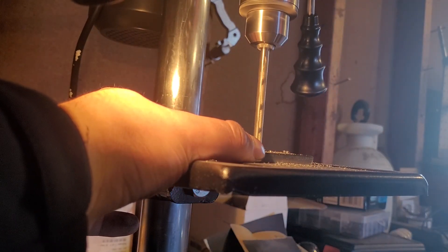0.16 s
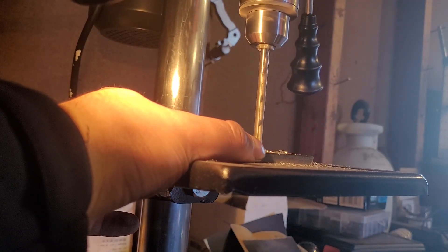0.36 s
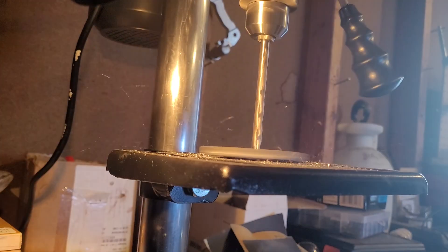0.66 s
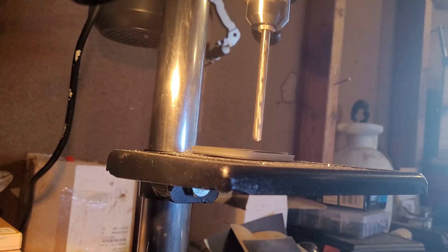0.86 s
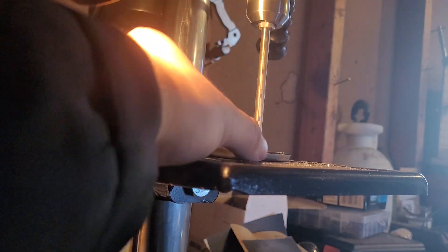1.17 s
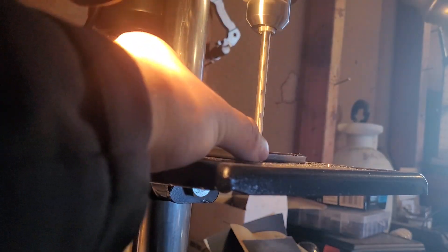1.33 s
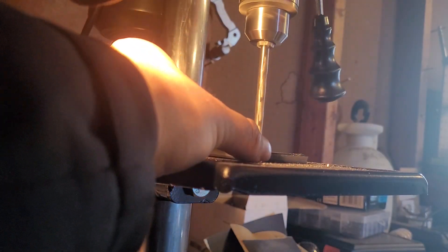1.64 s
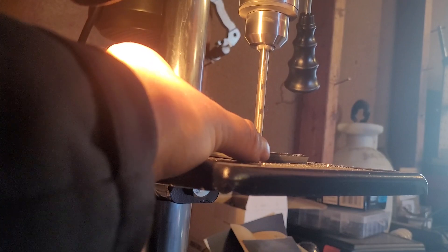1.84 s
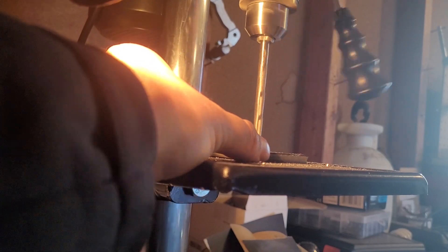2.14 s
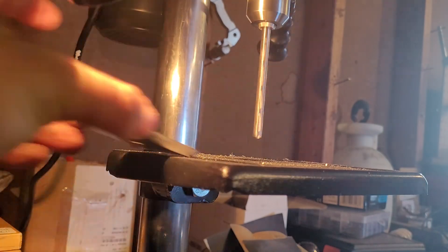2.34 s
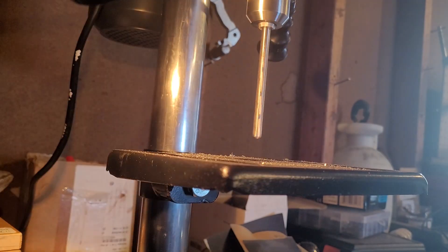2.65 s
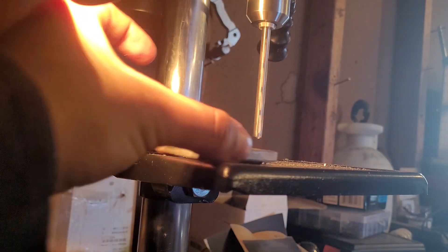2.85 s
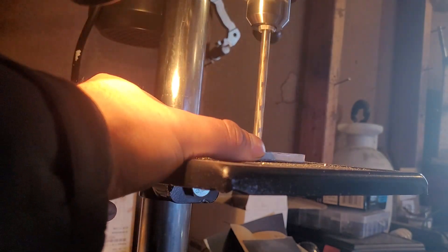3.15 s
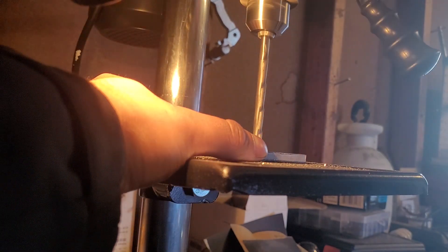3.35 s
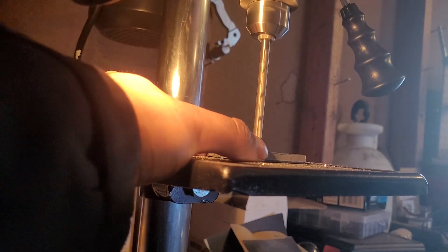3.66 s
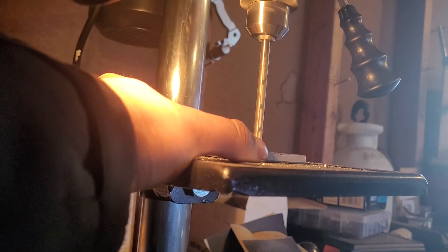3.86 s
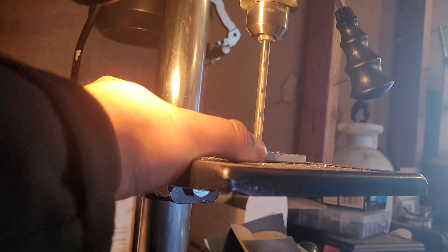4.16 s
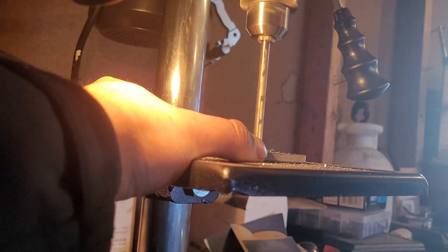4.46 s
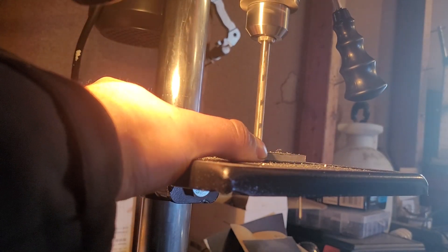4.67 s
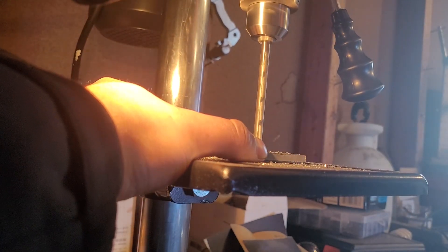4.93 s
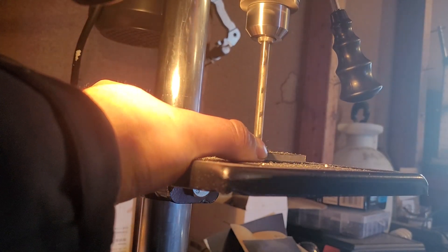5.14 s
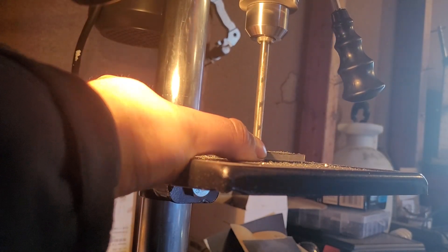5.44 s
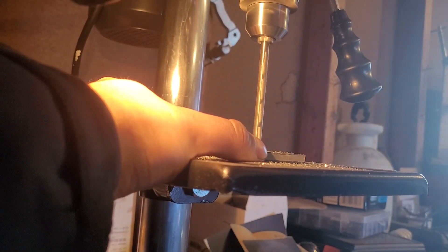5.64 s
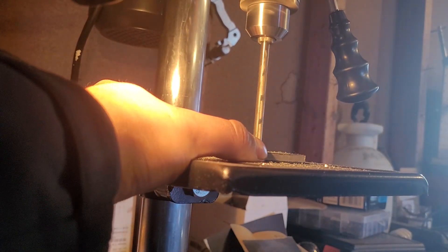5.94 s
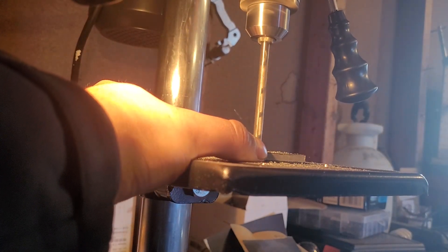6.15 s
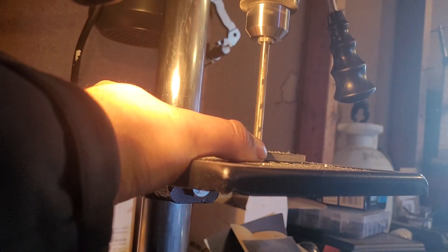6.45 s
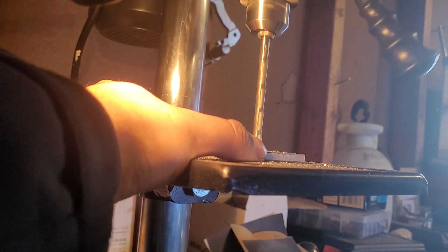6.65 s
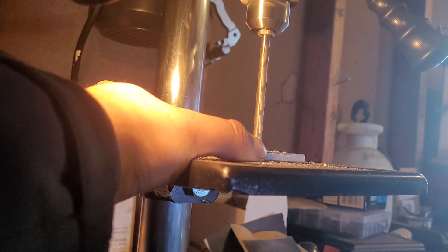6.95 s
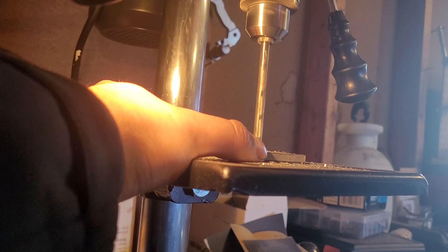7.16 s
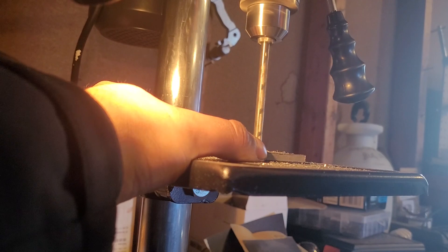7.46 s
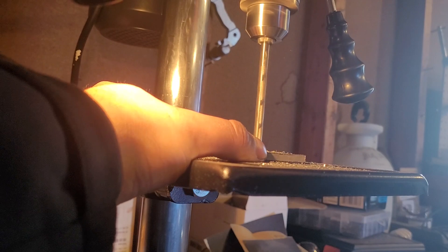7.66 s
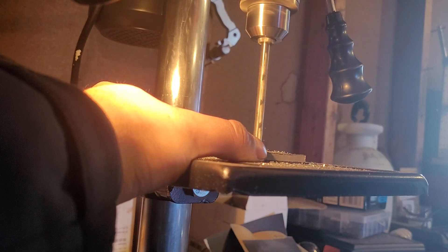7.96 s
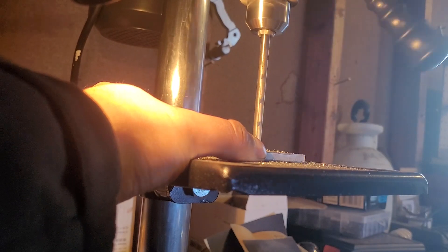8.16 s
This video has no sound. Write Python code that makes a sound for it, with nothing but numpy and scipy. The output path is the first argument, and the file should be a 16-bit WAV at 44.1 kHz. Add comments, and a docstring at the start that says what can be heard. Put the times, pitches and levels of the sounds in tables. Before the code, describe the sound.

A belt-driven drill press whirrs, hums and rattles continuously, heard close in stereo with short, dry garage echoes. A rough grinding cut ends in a clattering scrape and tiny high squeals as the steel plate spins loose. After a short sizzling bite come knocks, squeaks and a metallic ring. Then the drill cuts repeatedly, gritty and hissing, the rattle tightening each time and loosening as it lifts.

```python
"""You first hear a drill already biting into a small steel plate: it grinds, chatters and sizzles.
Around it a belt-driven drill press hums, whirrs and rattles in a garage; each new bite slows it down.
Steady tones make the hum, tiny random impacts through resonances the rattle, grinding and sizzle.
Let go, the plate scrapes round on the iron table, squeaks and squeals on the bit, knocks and rings once.
The drill comes down several more times; the sounds of plate and table are thumps and clicks that ring."""
import sys
import numpy as np
from scipy import signal
from scipy.fft import rfft, irfft
from scipy.io import wavfile

SR = 44100
rng = np.random.default_rng(int(sys.argv[2]) if len(sys.argv) > 2 else 0)


def master(y):
    """Save y as 16-bit WAV."""
    cut = np.clip(np.atleast_2d(y).T, -1, 1)
    pcm = np.round(cut * 32767)  # scale
    wavfile.write(sys.argv[1], SR, pcm.astype(np.int16))


N = 366030
TIME = np.arange(N) / SR   # s
BINS_HZ = np.maximum(np.arange(N // 2 + 1) * SR / N, 1)


def from_db(db):
    """Turn decibels into a gain."""
    return 10 ** (np.asarray(db) / 20)


def rms_one(x):
    """Scale x to an average strength (rms) of 1."""
    return x / np.sqrt(np.mean(x ** 2) + 1e-20)


def per_bin(points):
    """Read a table at every frequency of the spectrum, with straight lines over log frequency."""
    hz, value = np.transpose(points)
    return np.interp(np.log(BINS_HZ), np.log(np.maximum(hz, 1)), value)


def coloured(x, spectrum):
    """Give x a broad balance of low and high sound; rms 1."""
    return rms_one(irfft(rfft(x) * from_db(per_bin(spectrum)), N))


def high_pass(x, edge_hz):
    """Weaken everything below edge_hz, so that the gaps under a ringing part stay dark."""
    return signal.sosfilt(signal.butter(2, edge_hz, "high", fs=SR, output="sos"), x)


def drift(rate_hz):
    """Wander smoothly and at random with a spread of 1; a higher rate wanders faster."""
    step = 40   # samples between the slow points
    r = np.exp(-2 * np.pi * rate_hz * step / SR)
    warm_up = 2000   # points dropped while the filter settles
    noise = rng.standard_normal(N // step + 2 + warm_up)
    slow = rms_one(signal.lfilter([1], [1, -2 * r, r * r], noise)[warm_up:])
    return np.interp(np.arange(N) / step, np.arange(len(slow)), slow)


def resonate(x, modes, shift_db=lambda hz: 0):
    """Let x shake a set of resonances, each driven harder or softer by shift_db; rms 1."""
    out = 0
    for k, (hz, width, db) in enumerate(modes):
        r = np.exp(-np.pi * width / SR)
        poles = [1, -2 * r * np.cos(2 * np.pi * hz / SR), r * r]
        driven = x * from_db(db + shift_db(hz))
        sign = (-1) ** k   # neighbours get opposite signs
        out = out + sign * (1 - r * r) * signal.lfilter([1, 0, -1], poles, driven)
    return rms_one(out)


def ring(clicks, hz, t60):
    """Let each click start a sine that dies away by 60 dB in t60 seconds."""
    r = from_db(-60 / (t60 * SR))
    w = 2 * np.pi * hz / SR
    return signal.lfilter([0, np.sin(w)], [1, -2 * r * np.cos(w), r * r], clicks + 1e-18)


def grains(per_s, spread_db):
    """Make tiny impacts of uneven size at random moments; rms 1."""
    sizes = from_db(spread_db * np.minimum(rng.exponential(1, N), 4)) * rng.choice([-1, 1], N)
    return rms_one(sizes * (rng.random(N) < per_s / SR))


def clicks_at(seconds, db):
    """Place single clicks at the given times."""
    out = np.zeros(N)
    out[np.round(seconds * SR).astype(int)] = from_db(db)
    return out


def fading(x, fade_s):
    """Let every jump in x die away smoothly."""
    return signal.lfilter([1], [1, -np.exp(-1 / (fade_s * SR))], x + 1e-18)


def spurts(per_s, fade_s):
    """Gain that jumps at random moments and dies away."""
    starts = rng.exponential(1, N) * (rng.random(N) < per_s / SR)
    return fading(np.minimum(starts, 2), fade_s)


def swells(rows):
    """Gain of strokes that grow steadily to a peak and fall away."""
    return sum(from_db(db) * np.interp(TIME, [start, peak, end], [0, 1, 0])
               for start, peak, end, db in rows)


INERTIA_S = 0.0401   # the speed follows the load this late


def sluggish(x):
    """Follow x slowly, as the heavy turning parts do."""
    r = np.exp(-1 / (INERTIA_S * SR))
    return signal.lfilter([1 - r], [1, -r], x, zi=[r * x[0]])[0]


# The bit is pressed into the steel: start t/s, end t/s, time to bite t/s, wait until a chip forms t/s,
# time for the chips to clear t/s, sag of the main tone f/Hz, sizzle level/dB, chatter level/dB
# (both levels for the main part of the sound, before its extra layers)
PECKS = [(-0.3, 0.477, 0.078, 0.27, 0.011, 15.2, -41, -42),
         (1.741, 1.921, 0.062, 0.0035, 0.06, 6.1, -40, -39),
         (3.83, 5.394, 0.39, 0.066, 0.085, 8.2, -41, -41.5),
         (5.645, 6.517, 0.0406, 0.0044, 0.065, 5.8, -40, -40),
         (7.114, 8.118, 0.048, 0.005, 0.015, 4.8, -41, -40.5)]
CHIP_HOLD_S = 0.0083   # the chip keeps tearing this long after the pressure ends


def feed(sizzle_power=1.05):
    """Pressure drags the speed down and drives the cut: gives sag in Hz, sizzle gain, chatter gain."""
    drag_hz, sizzle, chatter = 0, 0, 0
    for start, end, bite_s, wait_s, clear_s, sag_hz, sizzle_db, chatter_db in PECKS:
        bite = 1 - np.exp(-np.maximum(TIME - start, 0) / bite_s)
        curl = 1 - np.exp(-np.maximum(TIME - start - wait_s, 0) / bite_s)
        chips = np.exp(-np.maximum(TIME - end - CHIP_HOLD_S, 0) / clear_s)
        pressure = bite * (TIME < end)
        drag_hz = drag_hz + sag_hz * pressure
        chatter = chatter + from_db(chatter_db) * pressure
        sizzle = np.maximum(sizzle, from_db(sizzle_db) * curl ** sizzle_power * chips)
    return sluggish(drag_hz), sizzle, sluggish(chatter)


def bites(turns):
    """One uneven thump each time a cutting edge catches, three times a turn; rms 1."""
    thumps = np.diff(np.floor(3 * turns), prepend=0)
    return rms_one(thumps * from_db(0.79 * drift(80)))


def slips(turns, catch_db):
    """Steel rubs on steel in tiny slips and catches three times a turn."""
    catches = np.cos(6 * np.pi * turns)
    unevenness_db = 1.0 * drift(50)
    return grains(per_s=9000, spread_db=2.5) * from_db(catch_db * catches + unevenness_db)


# Resonances heard as the bit grinds: f/Hz, width f/Hz, relative level/dB
GRIND_MODES = [(1360, 140, 1), (1553, 27, 6), (1770, 124, 1.5), (2310, 200, -5.5), (2570, 124, 1),
               (3250, 660, -5.5), (3970, 850, -5), (7300, 3800, -8)]
# The bit grinds on the rim of the hole: start t/s, peak t/s, end t/s, peak level/dB before the low cut,
# first favoured f/Hz, last favoured f/Hz
GRINDS = [(-0.05, 0.273, 0.53, -34, 3600, 1210), (3.6, 3.75, 3.82, -43.5, 4400, 3700)]


def grinding(turns, off_pitch_db=-10, bite_db=-3):
    """The bit grinds on the ragged rim of the hole; the ringing moves lower as it digs in."""
    out = 0
    for start, peak, end, db, first_hz, last_hz in GRINDS:
        octave = np.interp(TIME, [start, end], np.log2([first_hz, last_hz]))
        rubbing = slips(turns, catch_db=4.0) + from_db(bite_db) * bites(turns)
        # resonances far from the favoured pitch are driven more softly
        ringing = resonate(rubbing, GRIND_MODES,
                           lambda hz: off_pitch_db * np.minimum(abs(np.log2(hz) - octave), 1))
        out = out + swells([(start, peak, end, db)]) * ringing
    return high_pass(high_pass(out, edge_hz=920), edge_hz=920)


# Resonances that chatter with the cut: f/Hz, width f/Hz, relative level/dB
CUT_MODES = [(1147, 53, -1), (1558, 100, -4), (1622, 24, 6.5), (1976, 100, -1.5), (2344, 51, 3),
             (2520, 85, 1), (2755, 130, 3.5), (3313, 53, 2.5), (3694, 57, 0), (4130, 98, -8)]
# Resonances that sizzle at the bit: f/Hz, width f/Hz, relative level/dB
BIT_MODES = [(5080, 280, -13), (6470, 1030, -7), (7160, 55, -1), (7470, 190, -6), (9550, 150, -1.5),
             (9960, 180, -4.5), (11140, 180, -1), (11830, 390, -3.5), (12190, 370, 2), (12620, 260, -7),
             (12700, 130, -3), (14500, 320, -7.5)]


def cutting(turns, sizzle_gain, chatter_gain, throb_db=-2.0, tearing=1.0, swarf_db=-11,
            snap_db=-11, shimmer_db=1.5):
    """Three times a turn a bite thumps the work; tiny cracks in the tearing chip make the sizzle."""
    throb = np.cos(6 * np.pi * turns)
    tears = grains(per_s=2100, spread_db=4.5) * from_db(0.86 * throb + 2.0 * drift(31))
    # the contact keeps shifting between resonances
    ringing = resonate(bites(turns) + tearing * tears, CUT_MODES, lambda hz: shimmer_db * drift(25))
    chatter = high_pass(high_pass(ringing, edge_hz=1180), edge_hz=1180)

    crack_gain = from_db(throb_db * throb + 0.22 * drift(40)) * (1 + spurts(per_s=70, fade_s=0.0014))
    cracks = grains(per_s=4000, spread_db=-2.5) * crack_gain
    ringing_cracks = resonate(cracks, BIT_MODES, lambda hz: shimmer_db * drift(26))
    # loose chips rustle in the grooves of the bit
    swarf = high_pass(grains(per_s=5000, spread_db=4), edge_hz=7700)
    # chips break off
    snaps = resonate(grains(per_s=110, spread_db=-4.5), [(12400, 2800, 5), (7500, 1800, -12)])
    sizzle = ringing_cracks + from_db(swarf_db) * swarf + from_db(snap_db) * snaps
    return chatter_gain * chatter + sizzle_gain * sizzle


# Tones of spindle and belt: order (cycles per turn), level/dB running free, level/dB under load,
# both before the waver and the swelling of the housing
SPINDLE_TONES = [(6, -63, -68.5), (7, -65, -66.5), (7.6, -73, -69), (8, -59.8, -58.2), (9, -67.5, -66),
                 (10, -64, -67.3), (12, -70, -66), (13, -62, -62), (14, -67, -72), (16, -66, -67.5),
                 (17, -64, -66), (18, -66, -70), (19, -70, -68), (20, -69, -67.5), (21, -68, -69.5),
                 (22, -70, -67), (25, -68, -63.5), (27, -68, -64), (29, -68, -64.5), (33, -70, -65),
                 (35, -68, -66), (36, -66, -64)]
# The housing swells tones that come near these pitches: f/Hz, width f/Hz, boost level/dB
HOUSING = [(321, 22, 14), (392, 12, 13)]
# The main tone is this order: its pitch running free, and the sag that counts as full load
MAIN_ORDER, FREE_HZ, FULL_SAG_HZ = 8, 312, 4.5


def spindle(turns, load):
    """Tones locked to the turning: load shifts their balance, the housing swells those near its pitches."""
    out, speed_hz = 0, np.gradient(turns) * SR
    for order, free_db, loaded_db in SPINDLE_TONES:
        tone_hz = order * speed_hz
        waver_db = .7 * drift(3)
        housing_db = sum(db * np.exp(-((tone_hz - hz) / width) ** 2)
                         for hz, width, db in HOUSING if abs(tone_hz[-1] - hz) < hz / 2)
        gain = from_db(free_db + load * (loaded_db - free_db) + waver_db + housing_db)
        out = out + gain * np.sin(2 * np.pi * (order * turns + rng.random()))
    return np.sqrt(2) * out


# Hum and whine of the motor: f/Hz, level/dB running free, level/dB under load, both before the waver
MOTOR_TONES = [(146, -78, -78), (600, -53, -62), (1200, -62, -62), (1799, -57, -57), (2638, -55, -62),
               (3046, -54, -61), (3147, -57, -60), (3804, -56, -63), (4262, -63, -72), (4403, -62, -69)]


def motor(load, waver_db=2.0, phase_wander=0.82):
    """Magnetic hum and whine around steady pitches, mostly weaker under load; high tones waver more."""
    out = 0
    for hz, free_db, loaded_db in MOTOR_TONES:
        unsteady = np.sqrt(hz / 2000)
        phase = 2 * np.pi * (hz * TIME + rng.random()) + unsteady * phase_wander * drift(10.5)
        gain = from_db(free_db + load * (loaded_db - free_db) + unsteady * waver_db * drift(15.0))
        out = out + gain * np.sin(phase)
    return np.sqrt(2) * out


# Colour of the whirr: f/Hz, relative level/dB
WHIRR = [(25, -10), (80, -11), (130, -7), (200, -39), (270, 1.5), (430, 2.5), (600, -12), (900, 1),
         (1500, 9.5), (3500, 10), (5200, 4.5), (8000, -6.5), (16000, -35)]


def belt_whirr(load):
    """Many small impacts blur into a whirr; the belt runs slightly quieter when taut."""
    return from_db(-46.5 - 0.58 * load) * coloured(grains(per_s=9000, spread_db=5.5), WHIRR)


# The quill (the sleeve that carries the spindle) is drawn up, where it rattles less:
# start t/s, end t/s, change of level/dB
LIFTS = [(0.42, 0.994, -6.5), (2.434, 2.717, -3.5), (6.53, 6.912, -2), (8.129, 8.503, -2.5)]
LIFT_TRAVEL_S = 0.14


def lifted_db():
    """Drop in level while the quill is drawn up."""
    return sum(db * np.clip(.5 + np.minimum(TIME - start, end - TIME) / LIFT_TRAVEL_S, 0, 1)
               for start, end, db in LIFTS)


# The bit snags on the steel and shakes the quill: loudest moment t/s, rise of level/dB
SNAGS = [(3.09, 5), (5.72, 5), (7.46, 6.5), (8.07, 2.5)]
SNAG_LENGTH_S = 0.046   # from the loudest moment until the rise has shrunk to about a third


def snagging_db():
    """Rise in level as each snag swells and fades."""
    return sum(db * np.exp(-((TIME - s) / SNAG_LENGTH_S) ** 2) for s, db in SNAGS)


# Resonances of the belt cover, the head and the quill: f/Hz, width f/Hz, relative level/dB
COVER_MODES = [(293, 47, -11.5), (630, 190, -11.5), (815, 320, -10.5), (1094, 210, -6.5)]
HEAD_MODES = [(1333, 28, 1.5), (1419, 11.3, 4), (1560, 80, 0.5), (1639.5, 20.6, 4), (1776, 16, -0.5)]
QUILL_MODES = [(2106, 52, -6.5), (2430, 320, -5), (2650, 53, 3), (2820, 75, 3), (3066, 150, -4.5),
               (3198, 68, 4), (3313, 163, 3), (3782, 54, -1), (4270, 99, -2.5), (6160, 1800, -16.5),
               (9700, 630, -17)]
RATTLE_DB = -38   # base level, to which each part adds its own
COVER_TIGHTEN_DB = -13   # the belt cover all but stops buzzing under load


def rattle(turns, load, cover_db=-12.0, head_db=-6.5, quill_db=-3, head_tighten_db=-7, quill_tighten_db=-4):
    """Loose bearings shake cover, head and quill twice a turn; feed pressure takes up the play."""
    shake = from_db(RATTLE_DB + lifted_db() + 1.0 * np.cos(4 * np.pi * turns) + 0.9 * drift(23))
    shared = grains(per_s=900, spread_db=2.0)   # impacts that reach all three parts
    cover = resonate(shared + grains(per_s=1200, spread_db=4.0), COVER_MODES)
    head = resonate(shared + grains(per_s=3000, spread_db=2.5), HEAD_MODES)
    quill = high_pass(resonate(shared + grains(per_s=3000, spread_db=7.0), QUILL_MODES), edge_hz=770)
    cover_gain = from_db(cover_db + COVER_TIGHTEN_DB * load)
    head_gain = from_db(head_db + head_tighten_db * load)
    quill_gain = from_db(quill_db + quill_tighten_db * load + snagging_db())
    return shake * (cover_gain * cover + head_gain * head + quill_gain * quill)


def loose_chips(chips_db=-52.5, flicker_db=2.3, lift_share=0.33):
    """Chips left on the bit and the plate rustle as it spins, less when it is lifted clear."""
    flicks = grains(per_s=14000, spread_db=4.0)
    flicker = from_db(flicker_db * drift(60)) * (1 + spurts(per_s=66, fade_s=0.004))
    rustle = rms_one(flicks * flicker)
    return from_db(chips_db + lift_share * lifted_db()) * high_pass(rustle, edge_hz=6800)


# Colour of the rumble and hiss: f/Hz, relative level/dB
BACKGROUND = [(25, -5), (100, -4), (170, 9), (1000, -2), (4500, -2), (6000, 13), (9000, -27), (16000, -24)]


def background(background_db=-61):
    """Faint rumble and hiss from all round the garage, different at each microphone."""
    left_right = rng.standard_normal((2, N))
    return from_db(background_db) * np.array([coloured(noise, BACKGROUND) for noise in left_right])


# The plate brushes the bit: start t/s, length t/s, base level/dB, f/Hz that the contact favours
SQUEAKS = [(0.49, 0.01, -38, 12500), (0.53, 0.006, -41, 7500), (0.619, 0.11, -38, 11500),
           (0.715, 0.06, -45, 10500), (0.775, 0.011, -42, 13000), (0.877, .016, -51, 12500),
           (1.54, 0.022, -44, 13080), (2.01, 0.045, -47, 12500), (2.057, 0.051, -44, 13000),
           (2.1, 0.06, -53, 12500), (2.347, 0.044, -40.5, 13400), (2.888, 0.012, -48, 12270)]
# Resonances of that contact: f/Hz, width f/Hz, relative level/dB
SQUEAK_MODES = [(5620, 87, 9), (7040, 230, 3), (8340, 150, -1), (9960, 260, -2), (11640, 180, -2),
                (13100, 390, -0.5), (15500, 300, -7)]
SQUEAK_FADE_S = 0.008


def squeaks(off_pitch_db=-9, crunch_db=-7):
    """The plate's edge brushes the turning bit: short gritty bursts ring the steel near one pitch."""
    out, grit = 0, grains(per_s=12000, spread_db=3.5)
    for s, length_s, db, favoured_hz in SQUEAKS:
        touch = np.interp(TIME - s, [0, length_s / 2, length_s, length_s + SQUEAK_FADE_S], [0, 1, 1, 0])
        modes = [(hz, width, mode_db + off_pitch_db * abs(np.log2(hz / favoured_hz)))
                 for hz, width, mode_db in SQUEAK_MODES]
        rubbing = grit * (touch + 1e-9)
        crunch = rms_one(high_pass(rubbing, edge_hz=8800))
        # both parts have rms 1 over the whole scene, so scale them back to the brief touch
        gain = from_db(db) * np.sqrt(np.mean(touch ** 2))
        out = out + gain * (resonate(rubbing, modes) + from_db(crunch_db) * crunch)
    return out


# Ringing modes of the iron table: f/Hz, relative level/dB, time to fade by 60 dB t/s
TABLE_MODES = [(636, -13, 0.071), (1075, -7.5, 0.016), (1336, -1.5, 0.041), (1553, 2.5, 0.042),
               (1980, -3, 0.015), (2640, 0.5, 0.035), (3200, 4.5, 0.023), (4230, 1, 0.022),
               (5140, -5, 0.037), (5600, -1, 0.018), (8700, -4, .02)]


def tapping(turns, contact_hz):
    """The plate taps the table about three times a turn; a softer contact sounds duller; rms 1."""
    # the count wavers a little but never runs backwards
    count = np.maximum.accumulate(np.floor(3 * turns + .07 * drift(60)))
    taps = np.diff(count, prepend=count[0]) * from_db(1.5 * drift(80))
    body = sum((-1) ** k * from_db(db) * ring(taps, hz, t60)
               for k, (hz, db, t60) in enumerate(TABLE_MODES))
    return rms_one(signal.sosfilt(signal.butter(2, contact_hz, fs=SR, output="sos"), body))


# The spinning plate sets the table swaying on its arm: start t/s, peak t/s, end t/s, peak level/dB, f/Hz
THRUMS = [(0.59, 0.622, 0.68, -45, 252), (0.655, 0.694, 0.722, -37, 268)]


def thrum():
    """Short low notes as the table sways: sines that swell and fade."""
    return np.sqrt(2) * sum(swells([stroke]) * np.sin(2 * np.pi * (hz * TIME + rng.random()))
                            for *stroke, hz in THRUMS)


# The loose plate scrapes on the table: start t/s, peak t/s, end t/s, base level/dB at the peak
SCRAPES = [(0.515, 0.635, 0.685, -40), (0.64, 0.697, 0.739, -35.5)]
# Colour of the scrape: f/Hz, relative level/dB
SCRAPE_COLOUR = [(100, -27), (180, -39), (240, -14), (330, -25), (700, -12), (1050, -1.5), (1500, 3),
                 (2100, -5), (2900, -4), (4400, -5), (6200, -13.5), (8000, -12.5), (16000, -20)]
# The lightly held plate shivers on the table: start t/s, peak t/s, end t/s, peak level/dB,
# brightness of the contact f/Hz
SHIVERS = [(2.729, 2.788, 3.3, -45, 3400), (7.01, 7.114, 7.18, -50, 523)]


def loose_plate(turns, clatter_db=0.5, grit_db=5.0):
    """Let go, the plate clatters and scrapes, lurching once a turn; held lightly, it only shivers."""
    lurch = from_db(2.0 * np.cos(2 * np.pi * turns) + 0.8 * drift(40))
    clatter = from_db(clatter_db) * lurch * tapping(turns, contact_hz=2300)
    grit = from_db(grit_db) * coloured(slips(turns, catch_db=-0.5), SCRAPE_COLOUR)
    shivers = sum(swells([stroke]) * tapping(turns, contact_hz) for *stroke, contact_hz in SHIVERS)
    return swells(SCRAPES) * (clatter + grit) + shivers + thrum()


# The plate squeals on one mode: start t/s, length t/s, peak level/dB
SQUEALS = [(0.681, 0.012, -43), (0.713, 0.011, -36), (0.748, 0.0074, -36), (0.777, 0.009, -36),
           (0.96, 0.013, -39)]
SQUEAL_HZ, SQUEAL_T60_S = 5720, 0.05   # pitch, and time to fade by 60 dB


def squeals():
    """Sticking and slipping lock onto one mode of the plate: a pure chirp builds up and rings out."""
    level = 0
    for s, length_s, db in SQUEALS:
        build_up = np.clip(2 * (TIME - s) / length_s, 0, 1)
        ring_out_db = -60 * np.maximum(TIME - s - length_s, 0) / SQUEAL_T60_S
        level = level + build_up * from_db(db + np.maximum(ring_out_db, -200))
    return level * np.sin(2 * np.pi * SQUEAL_HZ * TIME + 1.1 * drift(60))


# The plate knocks on the table: t/s, relative level/dB
KNOCKS = [(1.5497, -30), (1.556, -33), (1.561, -37), (1.966, -32), (2.497, -26.5), (2.517, -37),
          (2.5292, -40), (2.919, -35), (3.05, -36.5), (3.5455, -35.5)]


def knocks(knock_db=-3, crack=1.0, crack_s=0.0089):
    """The plate hits the table: a short crack of noise, and the modes of the table ringing."""
    s, db = np.transpose(KNOCKS)
    strengths_db = rng.normal(0, 2.1, (len(s), len(TABLE_MODES)))   # each hit excites the modes unevenly
    ringing = sum((-1) ** k * ring(clicks_at(s, db + mode_db + strengths_db[:, k]), hz, t60)
                  for k, (hz, mode_db, t60) in enumerate(TABLE_MODES))
    burst = fading(clicks_at(s, db), crack_s) * rng.standard_normal(N)
    band = signal.butter(2, [400, 7000], "band", fs=SR, output="sos")
    return from_db(knock_db) * signal.sosfilt(band, ringing + crack * burst)


# Modes of the plate as it rings freely: f/Hz, level/dB, time to fade by 60 dB t/s
PING_MODES = [(6700, -35.5, 0.045), (7840, -35, 0.19), (8400, -35, .05), (9340, -40, .043),
              (13100, -41, .05), (15500, -26, 0.041)]
PING_S = 2.396   # the moment it comes free


def ping():
    """The plate slips off the bit and rings freely: one click starts all its modes."""
    return sum(ring(clicks_at(np.array([PING_S]), db), hz, t60) for hz, db, t60 in PING_MODES)


# How alike the two microphones hear: f/Hz, likeness (0 to 1)
LIKENESS = [(60, .7), (130, .88), (290, .995), (640, .985), (1410, .95), (3100, .85), (5200, .8),
            (6500, .6), (9500, .68), (13000, .8)]
# Left minus right: f/Hz, level/dB
BALANCE = [(60, -.5), (700, 0), (1290, -1), (2380, -4), (4400, -5.5), (8100, 1.5), (15000, 1.5)]
# How far left leads for a source fully off axis: f/Hz, phase/rad
LEAD = [(2900, 0), (3400, .45), (4200, .3), (4700, 1.1), (5400, 2.2), (6500, 2.0), (7600, 0)]
GARAGE_T60_S = .2   # the echoes fade by 60 dB in this time


def garage(x, off_axis):
    """Echoes from the clutter make two microphones differ in detail; level and phase differ as well."""
    echoes = rng.standard_normal(N) * from_db(-60 * TIME / GARAGE_T60_S)
    diffuse = rfft(echoes / np.sqrt(np.sum(echoes ** 2)))
    alike = np.clip(per_bin(LIKENESS), 0, .999)
    sides = np.array([[1], [-1]])   # left, right
    pair = np.sqrt((1 + alike) / 2) + sides * np.sqrt((1 - alike) / 2) * diffuse
    level = from_db(sides * per_bin(BALANCE) / 2)
    phase = np.exp(.5j * off_axis * sides * per_bin(LEAD))
    return irfft(rfft(x) * pair * level * phase, N)


def scene():
    """Speed and load drive the machine; the plate adds its own noises."""
    sag_hz, sizzle_gain, chatter_gain = feed()
    turns = np.cumsum((FREE_HZ - sag_hz) / MAIN_ORDER) / SR
    load = np.clip(sag_hz / FULL_SAG_HZ, 0, 1)   # the motor slows as the bit bites
    # dragged far below its speed, the whole drive is muted
    labouring = np.clip(sag_hz / FULL_SAG_HZ - 2, 0, 1)
    drive = spindle(turns, load) + motor(load) + rattle(turns, load) + belt_whirr(load)
    machine = from_db(-1.8 * labouring) * drive
    work = cutting(turns, sizzle_gain, chatter_gain) + grinding(turns) + loose_chips()
    plate = loose_plate(turns) + knocks() + squeaks() + squeals() + ping()
    return garage(machine + work, off_axis=0.97) + garage(plate, off_axis=0.78) + background()


def record(dry):
    """Cut the very top steeply, above 15900 Hz."""
    return signal.sosfilt(signal.ellip(10, .2, 80, 15900, fs=SR, output="sos"), dry)


dry = scene()
out = record(dry)
master(out)
```